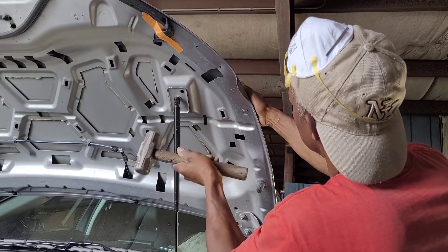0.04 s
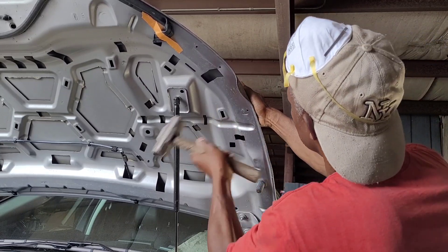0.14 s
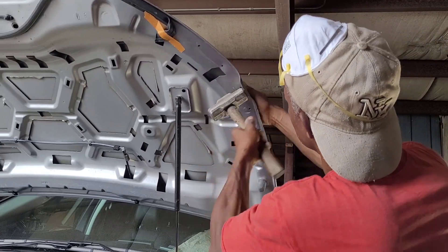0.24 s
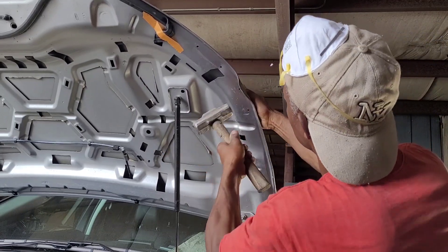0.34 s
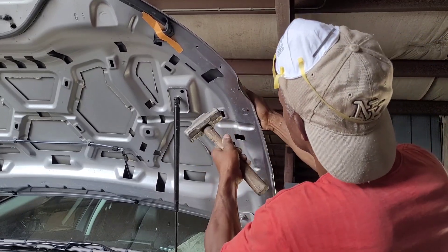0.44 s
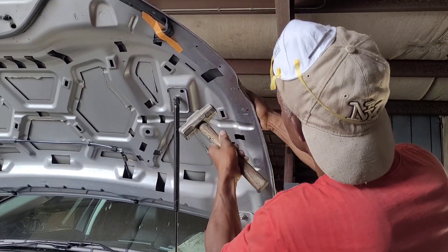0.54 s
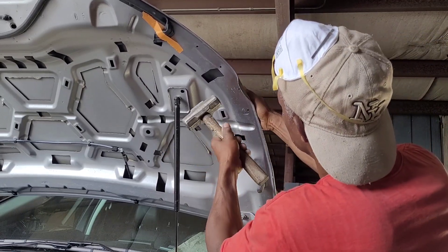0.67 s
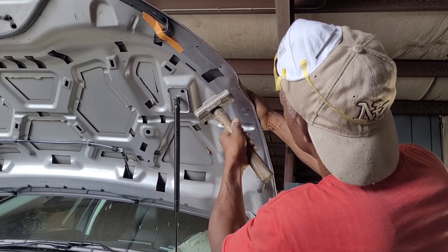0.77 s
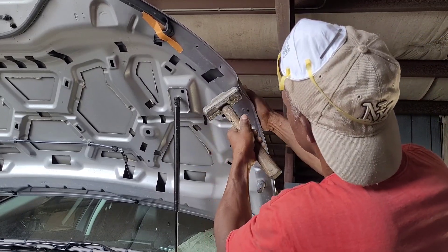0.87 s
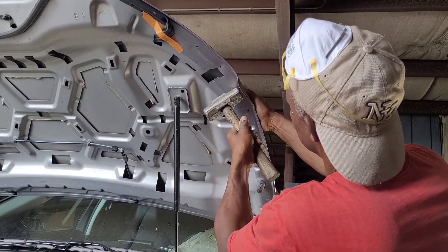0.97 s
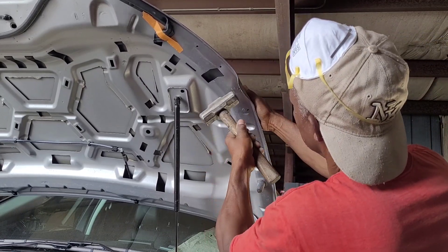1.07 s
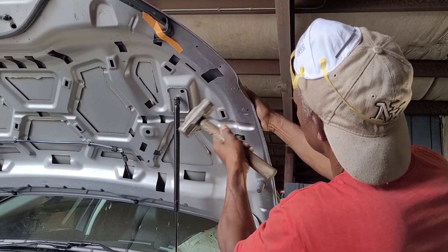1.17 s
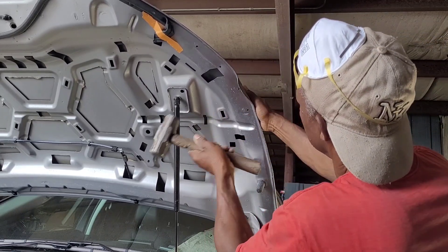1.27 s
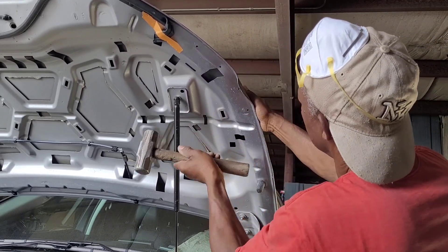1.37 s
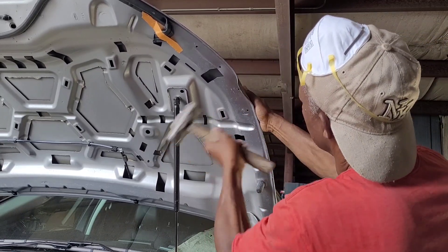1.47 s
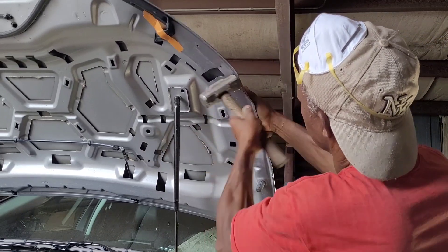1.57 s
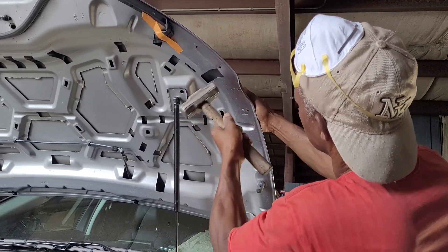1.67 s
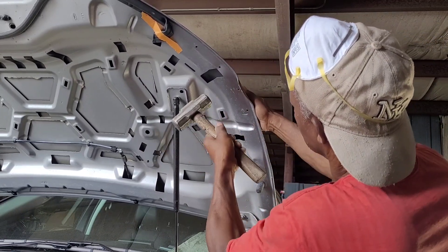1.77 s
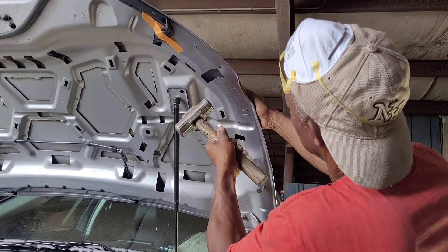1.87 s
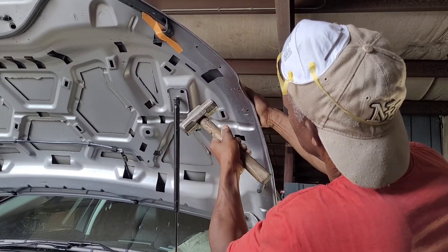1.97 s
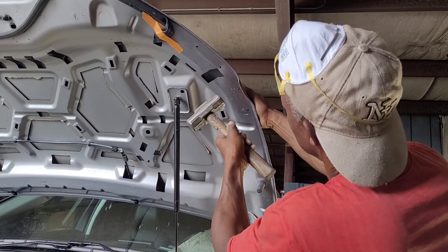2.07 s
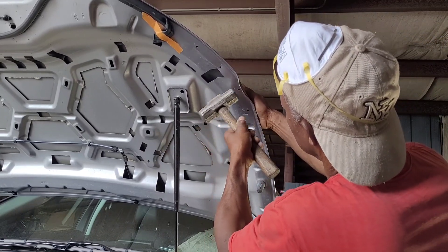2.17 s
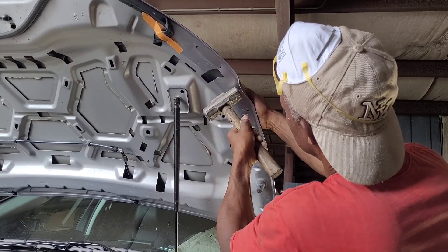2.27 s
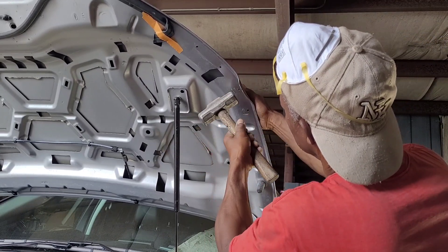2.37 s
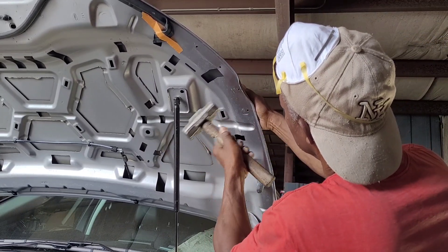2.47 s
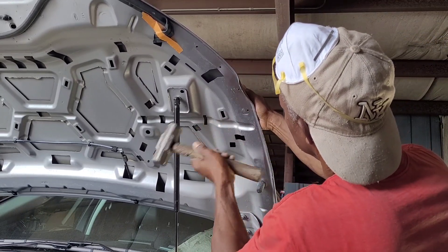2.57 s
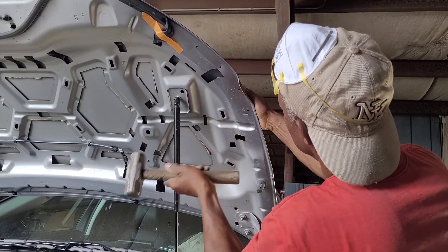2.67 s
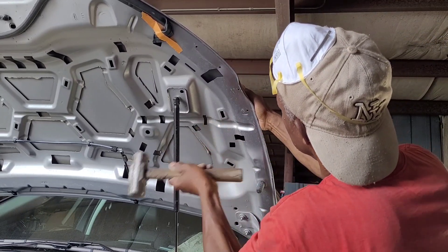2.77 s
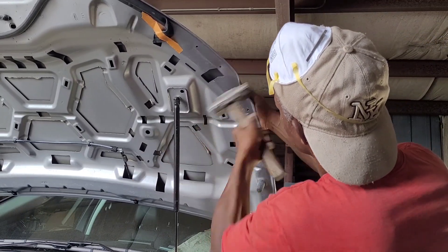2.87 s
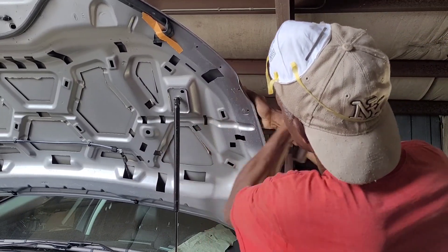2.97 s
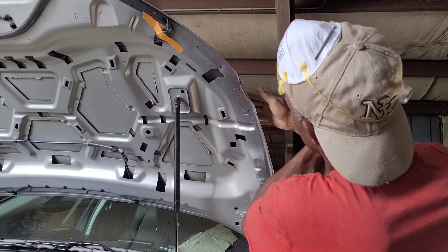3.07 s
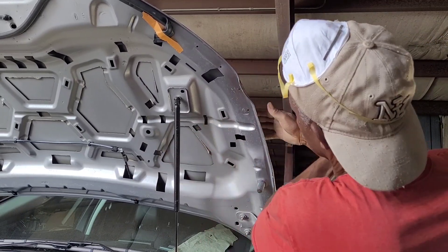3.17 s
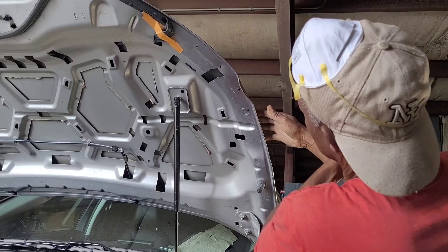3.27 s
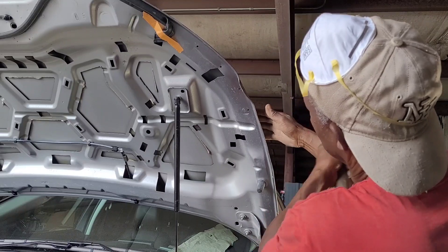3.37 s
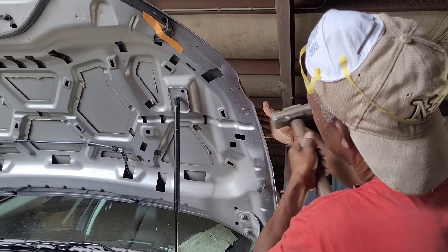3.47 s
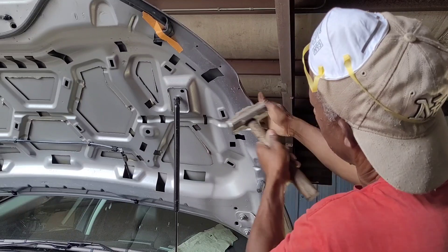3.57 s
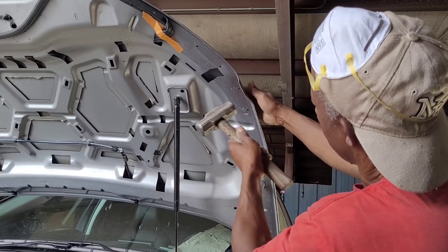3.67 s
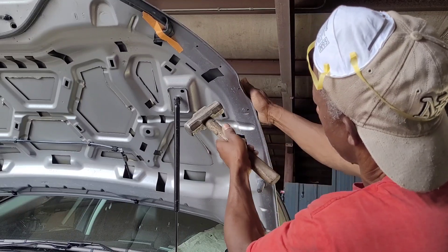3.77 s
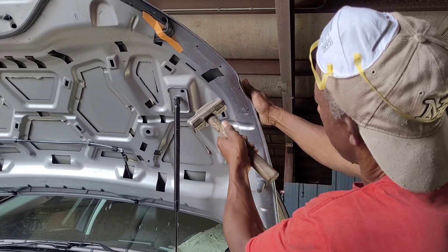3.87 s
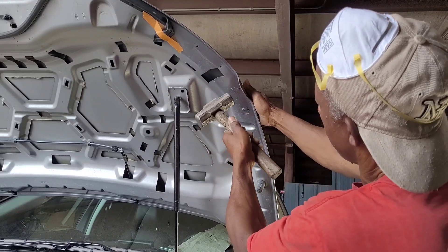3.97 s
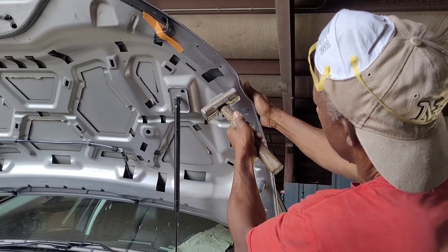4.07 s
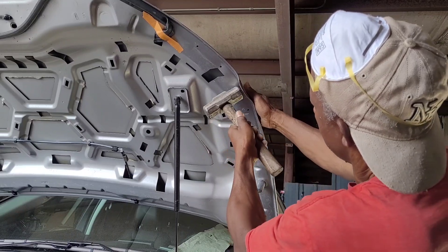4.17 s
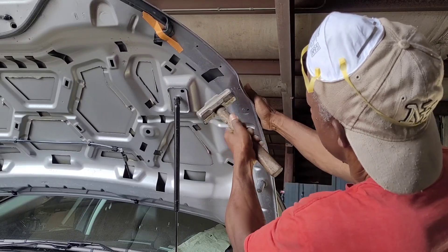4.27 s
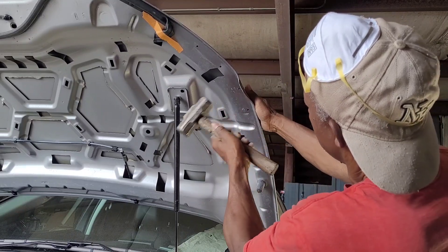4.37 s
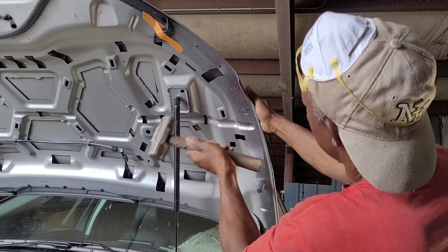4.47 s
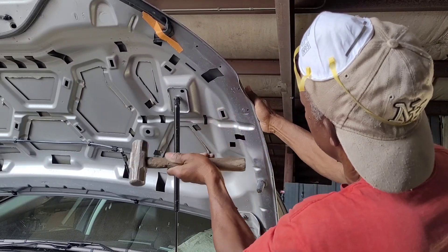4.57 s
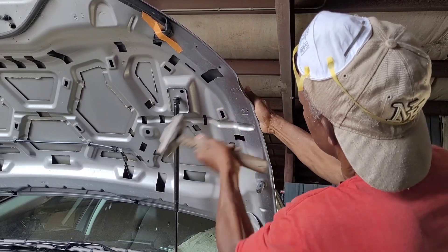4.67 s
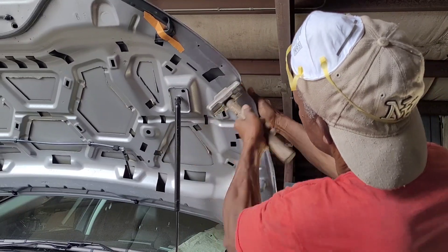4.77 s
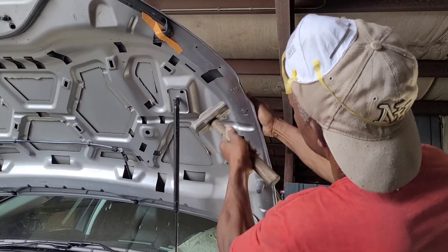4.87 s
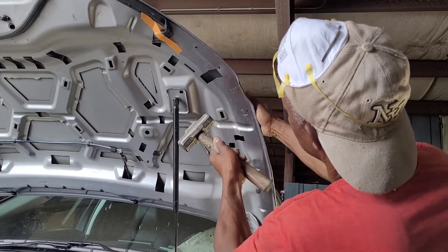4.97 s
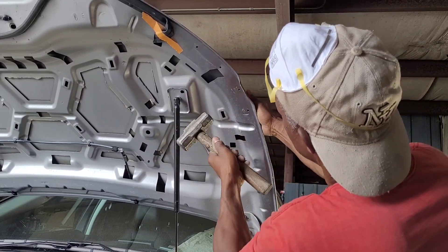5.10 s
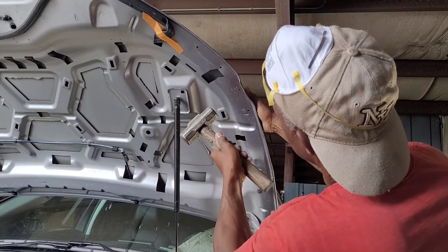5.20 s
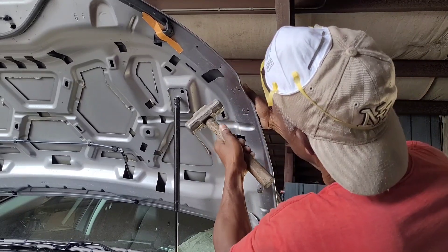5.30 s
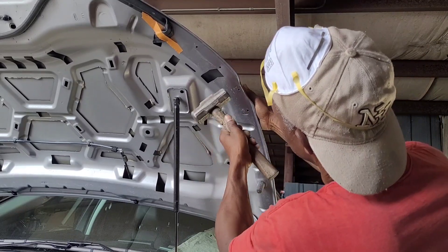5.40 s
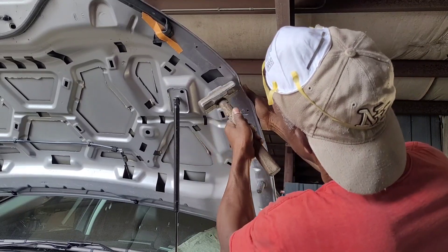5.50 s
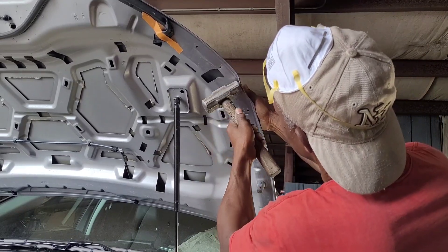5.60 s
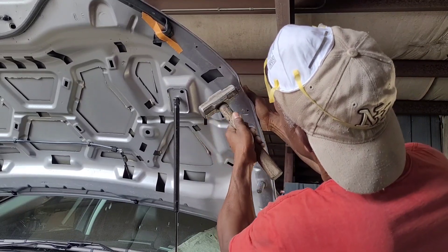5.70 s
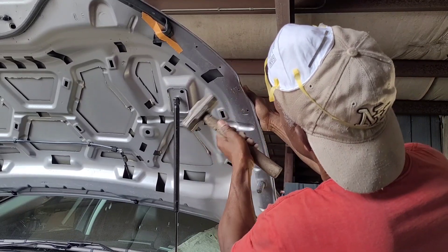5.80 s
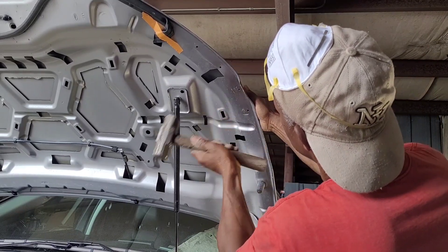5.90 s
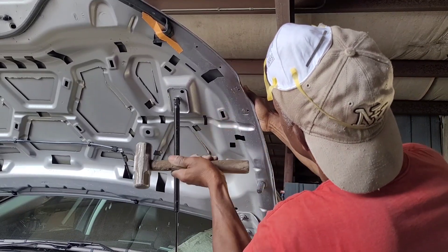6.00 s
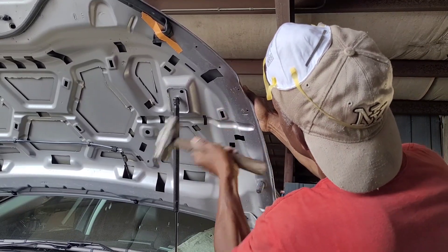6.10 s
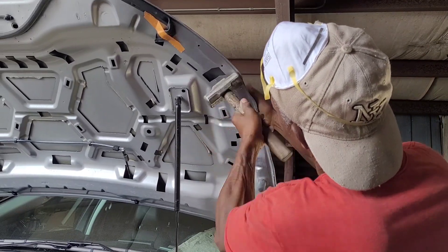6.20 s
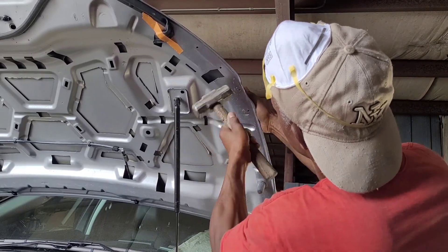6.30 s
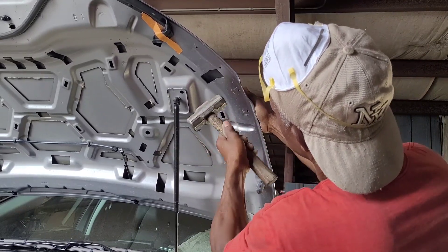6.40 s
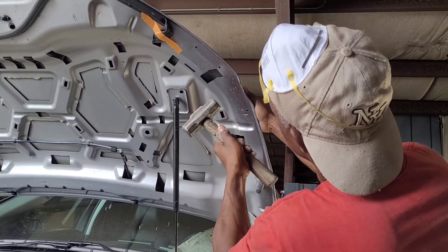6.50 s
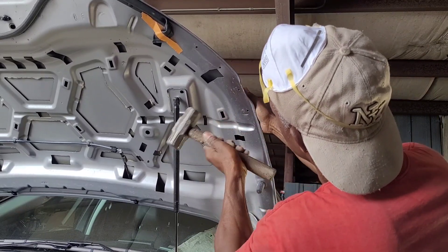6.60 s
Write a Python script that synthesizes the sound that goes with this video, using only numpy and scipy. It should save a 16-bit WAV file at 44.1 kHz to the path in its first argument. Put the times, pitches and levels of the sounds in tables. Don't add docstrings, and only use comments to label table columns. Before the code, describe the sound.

Hard hammer blows bang and ring briefly on a sheet-steel car hood, alternating with light taps, over low workshop hum and faint hiss.

```python
import sys
import numpy as np
from scipy import signal
from scipy.fft import rfft, irfft, next_fast_len
from scipy.io import wavfile

SR = 44100
rng = np.random.default_rng(int(sys.argv[2]) if len(sys.argv) > 2 else 0)


def to_wav(sig):
    pcm = np.clip(np.atleast_2d(sig), -1, 1) * 32767
    pcm = np.round(pcm).astype(np.int16)
    wavfile.write(sys.argv[1], SR, pcm.T)


def nominal_scale(level):
    x = np.asarray(level, float) / 20
    return 10 ** x


N = 293265

# (time [s], level [dB], panel boom [dB], brightness [dB], crack of the first touch [dB])
HARD_BLOWS = [
    (.2190, 2.5, 7, -10, -2.5),
    (1.5315, 0.5, 9.5, -9.5, -17),
    (4.7379, 4, 8, -9, -34),
    (6.1823, 0.5, 14, -1.5, -1),
]
LIGHT_TAPS = [
    (0.8497, -15.5, 1.7, -18, -25),
    (2.229, -17, -0.6, -13, -34),
    (4.102, -40.5, 7.5, -29, -54),
    (4.1400, -28.5, 3, -17, -39.5),
]
SOFT_TAPS = [
    (5.5430, -28, 9.5, -5, -44),
]
EDGE_BLOWS = [
    (2.8873, -1.6, 3.6, -9, -18),
]
# (frequency [Hz], likeness [0..1])
STEREO_LIKENESS = [(50, 0.91), (250, 0.92), (600, 0.53), (1200, 0.13), (4000, 0.08), (16000, 0.078)]


def at_hz(points, hz):
    grid, *columns = np.transpose(points)
    return [np.interp(np.log(hz), np.log(grid), column) for column in columns]


def rms_one(x):
    return x / np.sqrt(np.mean(x ** 2) + 1e-20)


def dying(seconds, t60):
    return nominal_scale(-60 * seconds / t60)


def lingering(seconds, t60, hold_s):
    return dying(np.hypot(seconds, hold_s) - hold_s, t60)


def band_pass(low_hz, high_hz):
    return signal.butter(2, [low_hz, high_hz], "band", fs=SR, output="sos")


def bands():
    edges_hz = 28 * 2 ** np.arange(0, 9.3, .4)
    return [(np.sqrt(low * high), band_pass(low, high)) for low, high in zip(edges_hz, edges_hz[1:])]


def stereo_pair(noises, hz):
    alike = np.clip(at_hz(STEREO_LIKENESS, hz)[0], 0, 1)
    return np.sqrt(1 + alike) * noises[0] + np.sqrt(1 - alike) * noises[1] * [[1], [-1]]


def coloured(x, points):
    size = 2 * next_fast_len(N // 2 + 1)
    hz = np.maximum(np.arange(size // 2 + 1) * SR / size, 1)
    cepstrum = irfft(np.log(nominal_scale(at_hz(points, hz)[0])), size)
    causal = np.r_[cepstrum[0], 2 * cepstrum[1:size // 2], np.zeros(size // 2)]
    return irfft(rfft(x, size) * np.exp(rfft(causal)), size)[..., :N]


def lay(blows, sounds):
    out = np.zeros(sounds.shape[1:-1] + (N + sounds.shape[-1],))
    for blow, sound in zip(blows, sounds):
        at = round(blow[0] * SR)
        out[..., at:at + sound.shape[-1]] += sound
    return out[..., :N]


def struck(blows, mid_db):
    colours = []
    for s, db, boom, bright, crack in blows:
        weakness = max(4.5 - db, 0) / 20
        top = bright - 6.5 - 5.0 * weakness ** 3.8
        colours.append((s, db, boom, mid_db + .6 * boom, bright, top))
    return colours


def blow_db(blows, hz):
    colour_hz = [250, 750, 2300, 4000, 12000]
    return np.array([db + np.interp(np.log(hz), np.log(colour_hz), [boom, mid, 0, bright, top])
                     for s, db, boom, mid, bright, top in blows])


def input_gain_db():
    # (time [s], gain [dB], creep [dB/s])
    gain_steps = [
        (0, 6, -4),
        (.23, -.5, -0.8),
        (2.9, -7, -0.9),
        (4.103, -1.5, 5.0),
        (4.75, 0.2, -1.8),
    ]
    t = np.arange(N) / SR
    latest = np.searchsorted([step[0] for step in gain_steps[1:]], t)
    s, db, creep = np.array(gain_steps)[latest].T
    return db + creep * (t - s)


def background(spectrum, level_db):
    mid, side = coloured(rng.standard_normal((2, N)), spectrum)
    unlike = [(hz, 10 * np.log10((1.001 - min(alike, 1)) / (1 + alike))) for hz, alike in STEREO_LIKENESS]
    return nominal_scale(level_db) * rms_one(mid + coloured(side, unlike) * [[1], [-1]])


def room_tone():
    # (frequency [Hz], density [dB per Hz])
    hum_spectrum = [(20, -30.5), (45, -4), (92, -6.5), (124, -3.5), (166, -14), (234, -6.5), (335, -14),
                    (429, -12), (517, -18.5), (568, -15.5), (787, -24.5), (964, -20), (1400, -29.5),
                    (1820, -61), (3080, -120)]
    # (frequency [Hz], density [dB per Hz])
    hiss_spectrum = [(760, -48.5), (1300, -11.5), (1800, -4), (2060, -2), (2650, -6), (2880, -3.5),
                     (3470, -10), (4700, -7), (6570, -15), (8010, -13.5), (9370, -16), (12000, -8.5),
                     (15800, -17.5)]
    gain_db = input_gain_db()
    return background(hum_spectrum, -51 + gain_db) + background(hiss_spectrum, -56.5 + gain_db)


def ticks():
    # (time [s], level [dB])
    lift_offs = [
        (.952, -52),
        (.984, -32),
    ]
    touches = [(blow[0], blow[-1]) for blow in HARD_BLOWS + LIGHT_TAPS + SOFT_TAPS + EDGE_BLOWS] + lift_offs
    snaps = rng.standard_normal((len(touches), 2, 500)) * dying(np.arange(500) / SR, .007)
    burst = lay(touches, nominal_scale(np.array(touches)[:, 1])[:, None, None] * snaps)
    return signal.sosfilt(signal.butter(1, 3000, "high", fs=SR, output="sos"), burst)


def clear_modes(blows, modes, level_db, spread_db, wobble_db):
    age = np.arange(int(.7 * SR)) / SR
    sounds = 0
    for hz, db, t60 in modes:
        luck_db = spread_db * rng.standard_normal(len(blows))
        gains = nominal_scale(blow_db(blows, hz) + db + level_db + luck_db)
        knots = rng.standard_normal((len(blows), 22))
        beats = np.array([np.interp(age * 30, np.arange(22), row) for row in knots])
        swell = 1 - np.exp(-age / min(6.5 / hz, .03))
        decay = lingering(age, 0.64 * t60, min(28.0 / hz, .07))
        swing = np.sin(2 * np.pi * hz * age + 0.85 * beats[::-1])
        sounds = sounds + gains[:, None] * nominal_scale(wobble_db * beats) * swell * decay * swing
    return lay(blows, sounds)


def crowd(blows, level_db, ring_share, hold_s):
    # (frequency [Hz], level [dB], rise [s], t60 [s])
    dense_modes = [(45, -36.5, .03, 0.28), (89, -15, 0.032, 0.25), (190, -12, 0.02, 0.35),
                   (328, -3, 0.069, 0.3), (490, -1, 0.0084, 0.27), (776, 3, 0.0087, 0.21),
                   (1290, -1, 0.0016, .22), (2270, -2.5, 0.00046, 0.28), (3500, -2, 0.00099, 0.35),
                   (6000, -4.5, 0.00057, 0.41), (12000, 2.5, 0.00082, 0.3), (16100, -5, .0003, .1)]
    sounds, age = 0, np.arange(SR // 2) / SR
    white = rng.standard_normal((2, 2, len(blows), 1, len(age)))
    lumps_db = 1.9 * rng.standard_normal((len(blows), 1, len(age) // 150))
    lumps = nominal_scale(np.repeat(lumps_db, 150, axis=2))
    for k, (hz, sos) in enumerate(bands()):
        db, rise, t60 = at_hz(dense_modes, hz)
        swell = 1 - np.exp(-age / max(rise * ring_share, 1e-4))
        decay = lingering(age, 0.79 * t60 * ring_share, hold_s + 1.07 * rise)
        shape = swell * decay * np.sqrt(SR / hz)
        rings = stereo_pair(signal.sosfilt(sos, white[k % 2] * shape * lumps), hz)
        sounds = sounds + nominal_scale(blow_db(blows, hz) + db + level_db)[:, None, None] * rings
    return lay(blows, sounds)


def seams():
    # (time [s], level [dB], t60 [s])
    buzzes = [
        (.23, -32, 0.15),
        (1.625, -23.5, 0.24),
        (1.72, -42.5, 0.11),
        (2.9, -32.5, 0.2),
        (4.75, -37, 0.23),
        (6.19, -27, 0.33),
    ]
    t = np.arange(N) / SR
    shake = 0
    for s, db, t60 in buzzes:
        loosening = 1 - np.exp(-np.maximum(t - s, 0) / .012)
        shake = shake + nominal_scale(db) * loosening * dying(np.abs(t - s), t60)
    hits = rng.random((2, N)) < 1200 / SR
    grains = hits * nominal_scale(3.0 * rng.exponential(1, (2, N))) * rng.standard_normal((2, N))
    bright = signal.sosfilt(band_pass(11500, 14500), grains)
    flap = nominal_scale(3 * np.sin(2 * np.pi * 55 * t))
    return shake * flap * rms_one(bright)


def shop(x):
    # (frequency [Hz], t60 [s])
    echo_decay = [(60, 0.5), (300, 0.34), (1000, 0.34), (3000, 0.44), (8000, 0.41), (16000, 0.52)]
    age = np.arange(int(.8 * SR)) / SR
    white = rng.standard_normal((2, 2, len(age)))
    echo = 0
    for k, (hz, sos) in enumerate(bands()):
        tail = white[k % 2] * dying(age, at_hz(echo_decay, hz)[0])
        echo = echo + stereo_pair(signal.sosfilt(sos, tail), hz)
    echo = echo * (1 - np.exp(-(age / 0.011) ** 2))
    return signal.fftconvolve(x[None], echo / np.sqrt(np.sum(echo ** 2) / 2))[:, :N]


def knocks():
    blows = LIGHT_TAPS + SOFT_TAPS
    puffs = rng.standard_normal((len(blows), 2000)) * dying(np.arange(2000) / SR, .03)
    burst = lay(blows, nominal_scale(np.array(blows)[:, 1] + 2.5)[:, None] * puffs)
    return signal.sosfilt(band_pass(300, 2600), burst)


def scene():
    # (frequency [Hz], level [dB], t60 [s])
    hard_modes = [(49, -10.5, .55), (85.7, -23, 0.36), (136.6, -9, .5), (245, -13, 0.12), (260.6, -9, 0.45),
                  (299.6, -5.5, 0.47), (362.5, -2, 0.22), (417, -11.5, 0.25), (505, -9, 0.26),
                  (599, -20, 0.15), (1653, -14, 0.1), (2416, -10.5, 0.11), (2440, -8, 0.096)]
    light_modes = [(51, -8.5, 0.45), (129.6, -7.5, 0.45), (111, -14, .55), (357, -13.5, 0.23),
                   (223, -14.5, 0.086), (270.5, -14.5, 0.35), (538, -6.5, 0.12), (589, 1, 0.14),
                   (682, -10, 0.16), (906, -8, 0.18), (1810, -13, 0.097), (2180, -6, 0.13),
                   (2334, -15.5, 0.25)]
    edge_modes = [(49.7, -17.5, 0.61), (137, -2.5, 0.27), (155.5, -33.5, 1.4), (206, -8.5, 0.29),
                  (264.4, 0, 0.33), (294.6, -25, 1.28), (370, -7, 0.28), (431, -8, .27), (316.5, -7, 0.25),
                  (534, -0.5, 0.35), (566, -0.5, 0.31), (605, 3, 0.22), (694, -11, 0.27), (751, -10.5, .18),
                  (896, -7.5, 0.21), (1657, -8, 0.16)]
    # (frequency [Hz], level [dB])
    tap_colour = [(1000, -2), (1400, -1.5), (1900, 1), (2600, -0.5), (2950, -7), (4500, 1)]
    # (frequency [Hz], level [dB])
    mic_colour = [(20, -47.5), (42, -0.5), (2500, -1.5), (3100, -1.5), (4800, 0), (6500, -2.5),
                  (9000, -2.5), (11500, -2), (14000, 0), (16000, -1)]
    firm, light = struck(HARD_BLOWS, mid_db=-8.5), struck(LIGHT_TAPS, mid_db=-8)
    soft, edge = struck(SOFT_TAPS, mid_db=-6.5), struck(EDGE_BLOWS, mid_db=-1.6)
    modes = (clear_modes(firm, hard_modes, -6.5, spread_db=-2.0, wobble_db=3.5)
             + clear_modes(light + soft, light_modes, -4.0, spread_db=3.0, wobble_db=5.5)
             + clear_modes(edge, edge_modes, -2.0, spread_db=1.5, wobble_db=3.0))
    hard = crowd(firm, -10.0, ring_share=1.113, hold_s=.044) + seams() + ticks()
    taps = coloured(crowd(light, -8.5, ring_share=0.66, hold_s=.026), tap_colour)
    taps = taps + crowd(soft, -7.5, ring_share=0.59, hold_s=.026)
    damped = taps + crowd(edge, -10.0, ring_share=1.13, hold_s=.035)
    into_shop = hard.mean(axis=0) + nominal_scale(-2.0) * damped.mean(axis=0) + nominal_scale(-8.5) * modes
    heard = coloured(modes + hard + damped + nominal_scale(-6) * shop(into_shop), mic_colour)
    return heard + room_tone() + knocks()


def roll_off(x):
    return signal.sosfilt(signal.butter(12, 17060, fs=SR, output="sos"), x)


def record(dry):
    bass = signal.lfilter(*signal.butter(1, 60, fs=SR), dry[0])
    treble_gain, bass_gain = nominal_scale(0.2), nominal_scale(-2.5)
    left = treble_gain * dry[0] - (treble_gain - bass_gain) * bass
    right_lag_s = .00014
    right = np.interp(np.arange(N) - right_lag_s * SR, np.arange(N), dry[1])
    ports = np.array([left, right])
    limit_db, release_db_s = -4, 39
    ramp = release_db_s * np.arange(N) / SR
    over_db = np.maximum(20 * np.log10(np.abs(ports).max(axis=0) + 1e-9) - limit_db, 0)
    held_db = np.maximum.accumulate(over_db + ramp) - ramp
    smooth_db = signal.lfilter([.008], [1, -.992], held_db)
    rounded = 1.144 * np.tanh(ports * nominal_scale(-.7 * smooth_db) / 1.126)
    band_limit = signal.ellip(12, .5, 60, 15750, fs=SR, output="sos")
    mix = signal.sosfilt(band_limit, rounded)
    return roll_off(mix)


dry = scene()
out = record(dry)
to_wav(out)
```